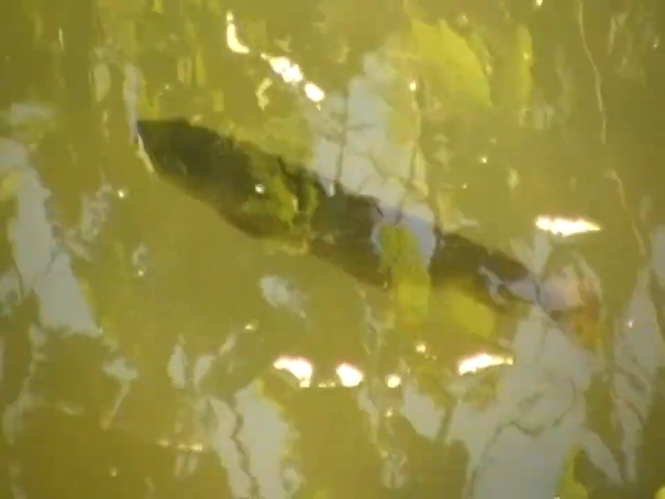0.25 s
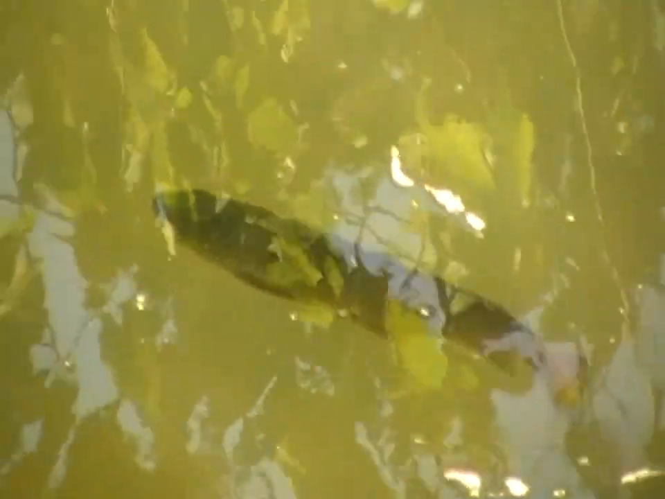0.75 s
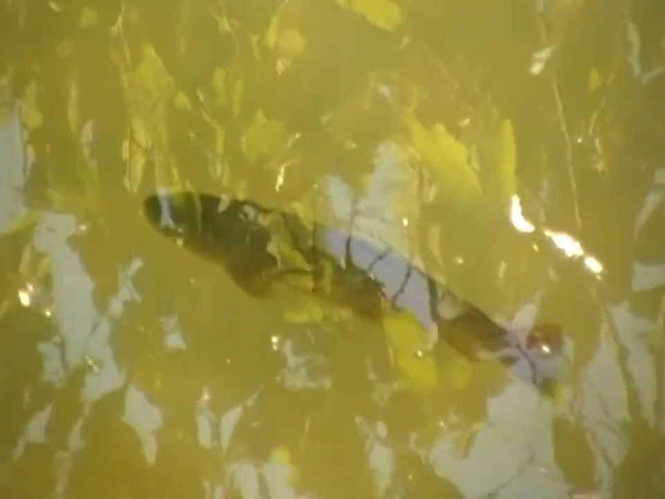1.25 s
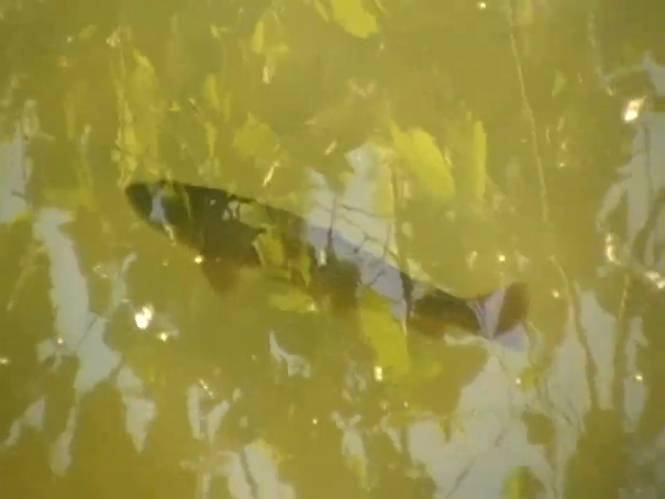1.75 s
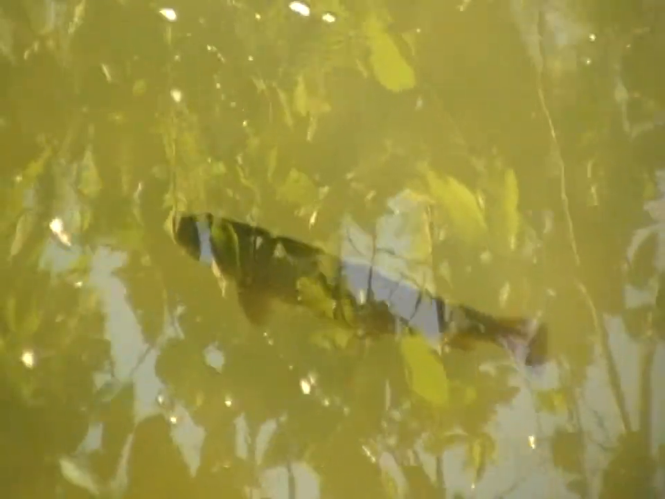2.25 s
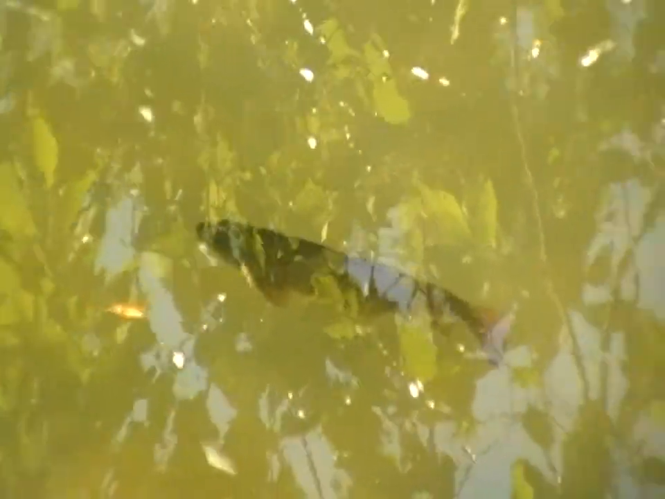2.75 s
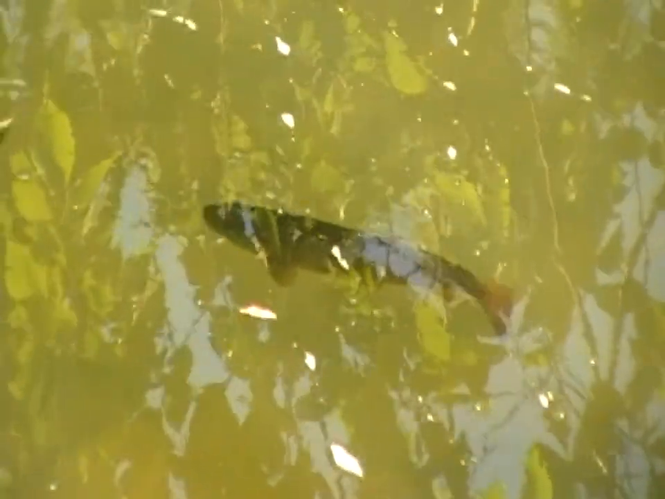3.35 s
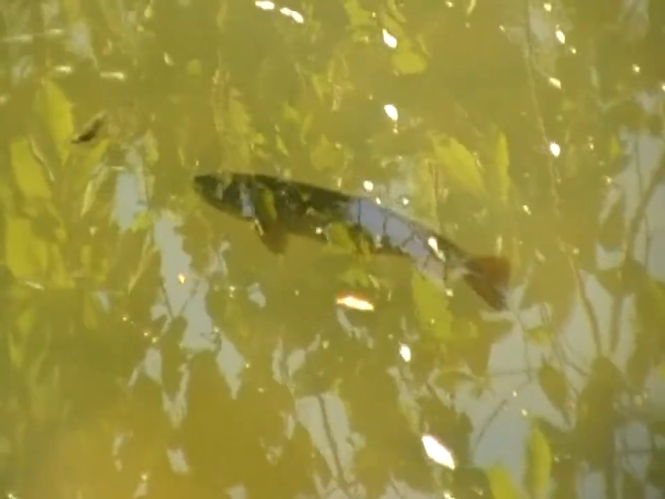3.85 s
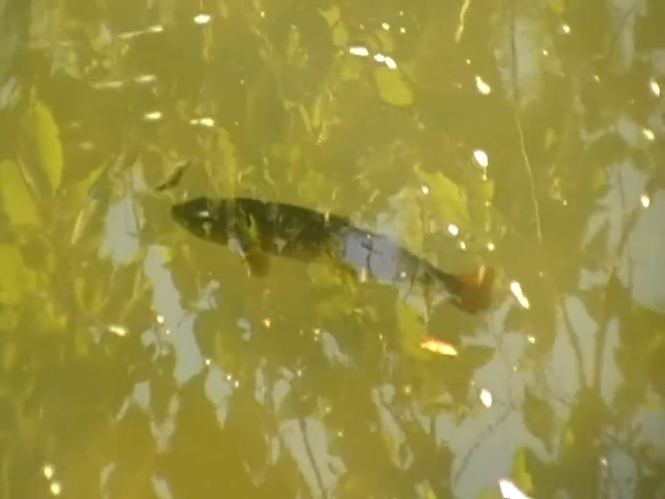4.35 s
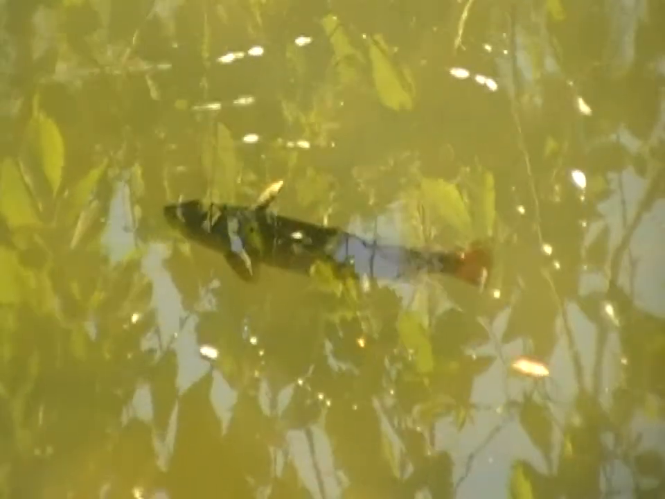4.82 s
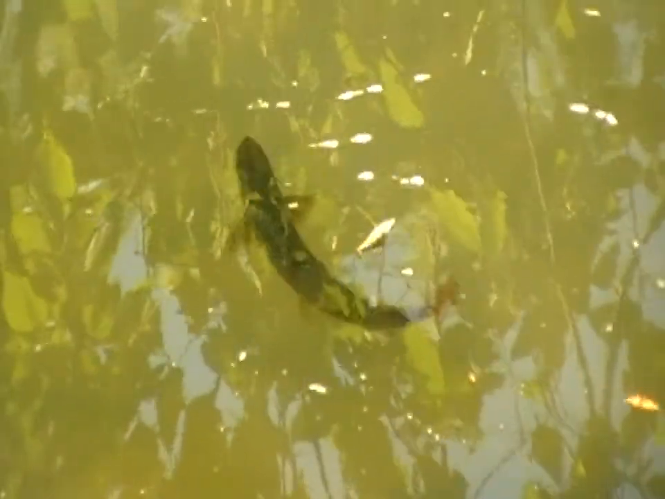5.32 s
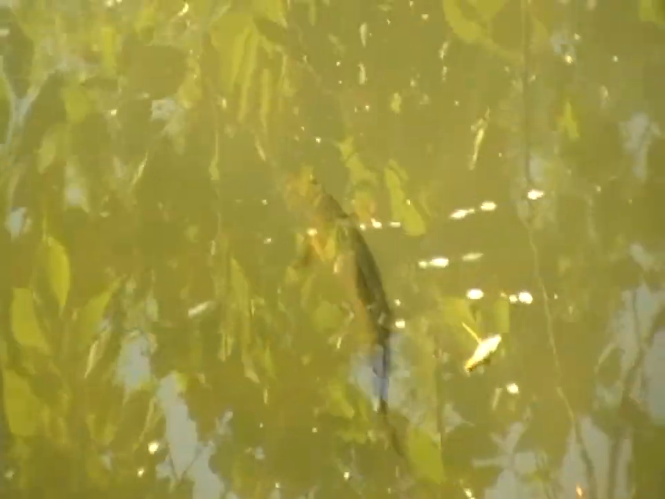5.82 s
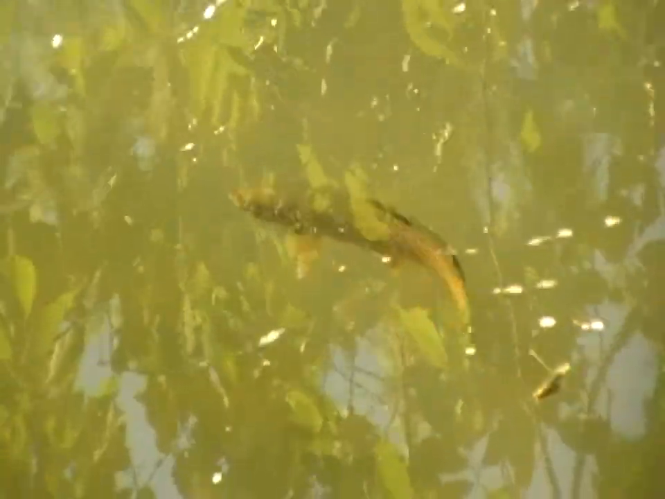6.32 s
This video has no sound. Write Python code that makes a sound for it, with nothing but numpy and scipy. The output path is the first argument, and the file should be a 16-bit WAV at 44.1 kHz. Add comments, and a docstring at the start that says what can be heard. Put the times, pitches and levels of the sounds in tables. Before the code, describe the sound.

From 0 to about 6.6 seconds, a dense insect chorus, probably cicadas, drones without pause: a shrill, grainy, hissing buzz concentrated around 5 to 6 kHz, almost steady, with slight flutter and a little brighter near 5.4 seconds. It is much louder on the right, with a wide, phasey stereo feel. Beneath are a soft camera motor whir, faint low airy noise and a barely perceptible hum. Fingers tap the plastic case at 0.3 and 0.55 seconds, then in a run from 2.07 to 2.43, with the sharpest click at 2.86 and small rattles until 3.3. Duller knocks come around 4.3, and a last one at 5.8. A distant bird whistles very faintly, gliding down at 1.3, then briefly at 2.1, 3.2 and 3.4, blurred by a short echo. The swimming fish makes no audible splash.

```python
"""Insect chorus over a quiet river

A dense chorus, probably cicadas, drones in the trees: click trains and noise ring a song peaking near 5.8 kHz.
A far bird gives a few faint gliding whistles, blurred by an echo tail. A hand-held camera whirs softly
(noise and motor lines), and its case clicks and knocks under the fingers (short pushes through resonances).
Low, airy noise and hum lie beneath. Chorus and camera are strongly out of phase between the channels,
and the right one hears the chorus much louder."""
import sys
import numpy as np
from scipy import signal
from scipy.fft import rfft, irfft, next_fast_len
from scipy.io import wavfile
from scipy.ndimage import map_coordinates

SR = 44100
rng = np.random.default_rng(int(sys.argv[2]) if len(sys.argv) > 2 else 0)


def log_audio(samples):
    """Write samples as a 16-bit WAV file to the path given in sys.argv[1]."""
    # one column per channel
    frames = np.atleast_2d(samples).T
    # limit to full scale, then quantise
    limited = np.clip(frames, -1, 1)
    pcm = np.round(limited * 32767).astype(np.int16)
    wavfile.write(sys.argv[1], SR, pcm)


N = 290178

# Nearly steady level of the whole chorus, with slight random unevenness: (time [s], level [dB])
CHORUS_LEVEL = [(0, -26), (0.72, -26), (0.93, -27.2), (1.27, -26), (1.55, -26), (2.45, -26), (2.75, -25.5),
                (2.9, -27), (3.2, -25.5), (3.75, -26.5), (4.1, -25.5), (4.2, -26), (4.32, -25.5),
                (4.87, -25.5), (4.94, -26), (5.75, -26.5), (6.15, -27), (6.35, -26), (6.58, -26)]
# Gain of the chorus treble above EDGE_HZ: (time [s], gain [dB])
TREBLE_GAIN = [(0, 1), (.5, 0.5), (1.2, -1), (2.6, -1.8), (4, -0.5), (4.7, -0.5), (5.4, 2.3), (5.85, 0.8),
               (6.1, 0.5), (6.58, -0.5)]
# Colour of the insects' song: (frequency [Hz], relative density [dB per Hz])
SONG_COLOUR = [(1350, -57), (2300, -44.5), (3010, -32), (3450, -23), (3850, -16), (4300, -12.5),
               (4600, -12.5), (5250, -3.5), (5790, 2), (6250, -2.5), (6900, -17), (7500, -28), (8300, -34),
               (9300, -43.5), (10300, -64), (13000, -88)]
# Colour of the faint high noise above the song: (frequency [Hz], relative density [dB per Hz])
HIGH_NOISE_COLOUR = [(6000, -40.5), (8000, 3), (10000, 1), (11700, 0.5), (13500, -12), (15700, -19.5)]
# Bird whistles: (time [s], length [s], start pitch [Hz], end pitch [Hz], level before echo [dB])
BIRD_WHISTLES = [(1.285, 0.2, 2750, 2350, -58), (2.067, 0.13, 2550, 2440, -63),
                 (3.214, 0.18, 2890, 2868, -59), (3.423, 0.26, 2480, 2470, -64.5)]
# Finger contacts on the case; ring and rattle are set against the blow's rms:
# (time [s], blow peak [dB], centre [Hz], width [octaves], ring [dB], rattle [dB])
FINGER_KNOCKS = [(0.291, -34, 820, 0.64, 0, -5.5), (0.545, -37, 695, 0.63, -9, -6),
                 (0.594, -41.5, 750, 0.8, -3, 1), (2.068, -36, 740, 0.79, -2.5, -11),
                 (2.276, -31, 830, 0.82, -0.5, -2.5), (2.314, -32, 966, 0.84, -1, -1),
                 (2.357, -33.5, 840, 0.52, -9, -5), (2.431, -35.5, 676, 1, -0.5, -6),
                 (2.854, -27.5, 740, 0.49, -5, -10), (2.8575, -35, 496, 0.52, 8, -25),
                 (2.8605, -21.5, 1390, 0.65, 3.5, -13), (2.861, -33.5, 3400, 0.1, -19, -18),
                 (2.8647, -25, 1570, 0.25, -3, -18), (2.897, -39, 1750, 0.37, -8, -2),
                 (2.9155, -36.5, 1340, 0.25, -12, -8), (3.003, -36, 1600, 0.7, -5, -5),
                 (3.0055, -37.5, 670, 0.3, -3, -9), (3.016, -42, 1050, 0.87, 3, -12),
                 (3.269, -42, 564, 0.18, -17, -22), (3.311, -44.5, 560, 0.25, -20, 1),
                 (4.265, -31, 533, 0.29, -22, -10.5), (4.2935, -31.5, 528, 0.31, -23, -15),
                 (4.299, -39, 614, 0.15, -16, -14), (5.830, -31.5, 906, 0.58, -6.5, -4)]
# Resonances of the camera case: (frequency [Hz], width [Hz], gain [dB])
CASE_MODES = [(510.4, 15, 6), (660, 25, -4), (745, 72, -2), (945, 49, -10), (1107, 30, -2.5),
              (1365, 37, 1.5), (1586, 25, 5), (1910, 110, -4), (2050, 34, -5), (2430, 27, -5)]
# Camera motor lines: (frequency [Hz], centre rms level [dB])
MOTOR_LINES = [(543, -69), (581, -80), (724, -84.5), (1025, -76.5), (1086, -67), (1145, -70), (1601, -82)]
# Colour of the camera's whir: (frequency [Hz], relative density [dB per Hz])
WHIR_COLOUR = [(150, -35.5), (330, -12), (460, -13), (560, 5.5), (670, 2), (850, 4), (1130, 1), (1270, -6),
               (1380, 3), (1600, -23), (1780, -5), (2000, -3.5), (2600, -37), (4000, -59.5)]
# Level of each channel's own share of the riverside air: (time [s], level [dB])
BREEZE_LEVEL = [(0, -59.5), (1.2, -56.5), (2, -60.5), (3.5, -62.5), (4.3, -58.5), (5.3, -61), (6.58, -58.5)]
# Colour of the riverside air: (frequency [Hz], relative density [dB per Hz])
AIR_COLOUR = [(25, -25.5), (45, -21), (70, -8), (100, -14), (170, -8), (280, 1), (380, 2.5), (600, -11.5),
              (1200, -1), (2400, -19), (5000, -42.5)]
# Faint low hum: (frequency [Hz], rms level [dB])
HUM_LINES = [(62, -93), (123, -85)]
# Left channel against right for chorus and bird: (frequency [Hz], level [dB])
FAR_LEVEL_RATIO = [(2500, -4.5), (3200, -8), (4200, -9.5), (5000, -10.5), (5800, -11.5), (7000, -13.5),
                   (8000, -18), (10000, -29.5)]
# Left channel's lead over right for chorus and bird: (frequency [Hz], phase [rad])
FAR_PHASE_LEAD = [(2500, 3.1), (3000, 2.4), (4000, 2.54), (6000, 2.2), (8000, 1.8)]
# Left channel against right for sound carried by the case: (frequency [Hz], level [dB])
CASE_LEVEL_RATIO = [(200, 3), (520, 3.9), (1100, 1.3), (2200, 3.5)]
# Left channel's lead over right for sound carried by the case: (frequency [Hz], phase [rad])
CASE_PHASE_LEAD = [(200, 3.3), (520, 3.69), (900, 3.93), (2200, 3.6)]

RASP_HZ, EDGE_HZ = 4931, 6800  # the shrill band starts at the first; its treble lies above the second
CLICK_DB = -7.5  # insect clicks against the scattered wash
RASP_DB = -11.5  # lower rasp against the shrill band
HIGH_NOISE_DB = -52  # centre level of the high noise against the shrill band
ECHO_SHARE, ECHO_T60_S = 0.14, 0.12  # the trees' answer to the bird
RATTLE_T60_S = 0.12  # how fast the rattle after a knock dies
CASE_LOW_HZ, CASE_HIGH_HZ = 300, 2500  # the thin plastic carries little outside this range
TOP_HZ = 15720  # upper band limit


def amp(db):
    """Decibels to gain."""
    return 10 ** (np.asarray(db) / 20)


def unit(x):
    """x at rms 1."""
    return x / np.sqrt(np.mean(x ** 2) + 1e-20)


def along(points, hz):
    """(Hz, value) points read on a log axis."""
    f, v = np.transpose(points)
    return np.interp(np.log(hz + 1), np.log(f + 1), v)


def curve(points):
    """(time, value) points as one value per sample."""
    s, v = np.transpose(points)
    return np.interp(np.arange(N) / SR, s, v)


def wobble(rate):
    """A smooth random curve, rate knots a second."""
    knots = rng.standard_normal(256)
    coarse = np.arange(0, N + 64, 64)
    smooth = map_coordinates(knots, [coarse * rate / SR], mode="wrap")
    return np.interp(np.arange(N), coarse, smooth)


def filtered(x, response):
    """x times a complex response of frequency."""
    size = x.shape[-1]
    m = next_fast_len(size + SR // 10)
    spectrum = rfft(x, m) * response(np.fft.rfftfreq(m, 1 / SR))
    return irfft(spectrum, m)[..., :size]


def noise(colour):
    """Noise of rms 1 with the given colour."""
    return unit(filtered(rng.standard_normal(N), lambda hz: amp(along(colour, hz))))


def sine(hz, drift):
    """A steady pitch of rms 1 whose phase drifts [rad]."""
    t = np.arange(N) / SR
    return np.sqrt(2) * np.sin(2 * np.pi * hz * t + drift)


def stereo(x, balance, phase):
    """Split x into two channels, with a level and phase difference, whose mean is x."""
    def pair(hz):
        ratio = amp(along(balance, hz)) * np.exp(1j * along(phase, hz))
        return 2 * np.array([ratio, np.ones_like(ratio)]) / (1 + ratio)
    return filtered(x, pair)


def tymbals(click_hz, spread, jitter, swell_db, count):
    """Click trains of many insects, each at its own rate and swelling on its own."""
    clicks = np.zeros(N)
    for _ in range(count):
        rate = click_hz * np.exp(spread * rng.uniform(-1, 1))
        gap, size = rng.standard_normal((2, 4096))
        at = (np.cumsum(np.abs(1 + jitter * gap)) * SR / rate).astype(int)
        heard = at < N
        train = np.bincount(at[heard], amp(2 * size[heard]), N)
        clicks += train * amp(swell_db * wobble(2.99))
    return unit(clicks - clicks.mean())


def chorus():
    """Tymbal clicks ring the insects' bodies; the trees scatter most of them into an even wash."""
    treble_db = curve(TREBLE_GAIN)
    direct = tymbals(click_hz=229.7, spread=.5, jitter=.1, swell_db=2.5, count=14)
    wash = rng.standard_normal(N)
    song = filtered(amp(CLICK_DB) * direct + wash, lambda hz: amp(along(SONG_COLOUR, hz)))

    def above(corner):
        return filtered(song, lambda hz: 1 / (1 + (corner / (hz + 1)) ** 24))

    upper, treble = above(RASP_HZ), above(EDGE_HZ)
    shrill = unit(upper + (amp(treble_db) - 1) * treble) * amp(0.35 * wobble(22))
    rasp = unit(song - upper) * amp(RASP_DB)
    # faint high noise follows the treble's level and wavers at random
    high_noise_db = HIGH_NOISE_DB + 2.4 * treble_db + 1.5 * wobble(14)
    high_noise = noise(HIGH_NOISE_COLOUR) * amp(high_noise_db)
    return amp(curve(CHORUS_LEVEL)) * (shrill + rasp + high_noise)


def bird():
    """Far whistles swell and glide down to a level pitch, blurred by echoes among the trees."""
    t, whistles = np.arange(N) / SR, np.zeros(N)
    for start, length, start_hz, end_hz, db in BIRD_WHISTLES:
        u = np.clip((t - start) / length, 0, 1)
        glide = end_hz + (start_hz - end_hz) * (1 - u) ** 2
        pitch = glide * (1 + 0.004 * wobble(70))
        tone = np.sqrt(2) * np.sin(2 * np.pi * np.cumsum(pitch) / SR)
        swell = np.abs(np.sin(np.pi * u ** 1.3)) ** 0.62
        whistles += amp(db + 2.8 * wobble(38)) * swell * tone
    tail = rng.standard_normal(SR // 2) * amp(-60 * t[:SR // 2] / ECHO_T60_S)
    echo = signal.fftconvolve(whistles, tail / np.linalg.norm(tail))[:N]
    return (1 - ECHO_SHARE) * whistles + ECHO_SHARE * echo


def case_response(f):
    """The ringing of the camera case: resonances summed with alternating sign."""
    total = 0
    for k, (centre, width, db) in enumerate(CASE_MODES):
        mode = 1j * f * width / (centre * centre - f * f + 1j * f * width)
        total = total + (-1) ** k * amp(db) * mode
    return total


def handling():
    """Each finger contact is a short push that rings the case, with a brief rattle after it."""
    out, t = np.zeros(N + SR), np.arange(SR // 5) / SR
    lead = SR // 100  # room ahead of the push for the filters' spread
    push = signal.unit_impulse(len(t), lead)
    after = np.maximum(t - lead / SR, 0)
    decay = (after > 0) * amp(-60 * after / RATTLE_T60_S)
    for start, db, centre_hz, octaves, ring_db, rattle_db in FINGER_KNOCKS:
        def band(hz):
            passed = 1 / (1 + (hz / CASE_HIGH_HZ) ** 6 + (CASE_LOW_HZ / (hz + 1)) ** 6)
            return np.exp(-.5 * (np.log2((hz + 1) / centre_hz) / octaves) ** 2) * passed

        blow = unit(filtered(push, band))
        ring = unit(filtered(push, lambda hz: np.sqrt(band(hz)) * case_response(hz)))
        rattle = unit(filtered(rng.standard_normal(len(t)) * decay, band))
        knock = blow + amp(ring_db) * ring + amp(rattle_db) * rattle
        first = round(start * SR) - lead
        out[first:first + len(t)] += amp(db) * knock / np.abs(blow).max()
    return out[:N]


def camera_whir():
    """A small motor: soft noise, partly ringing in the case, and a few unsteady lines."""
    lines = np.zeros(N)
    for hz, db in MOTOR_LINES:
        lines += amp(db + 2.0 * wobble(11)) * sine(hz, 1.05 * wobble(16))
    ringing = unit(filtered(rng.standard_normal(N), case_response))
    return lines + amp(-58.0) * noise(WHIR_COLOUR) + amp(-73.5) * ringing


def air():
    """The faint low rush of the riverside, partly shared by the channels, over a wavering hum."""
    shared = noise(AIR_COLOUR)
    left = noise(AIR_COLOUR) + 0.78 * shared
    right = noise(AIR_COLOUR) + 0.43 * shared
    level_db = curve(BREEZE_LEVEL) + 0.29 * wobble(1.5)
    hum = sum(amp(db) * sine(hz, .7 * wobble(5)) for hz, db in HUM_LINES)
    return hum + amp(level_db) * np.array([left, right])


def scene():
    """Trees and bird from afar, the camera's own sounds through its case, and the air."""
    far = stereo(chorus() + bird(), FAR_LEVEL_RATIO, FAR_PHASE_LEAD)
    near = stereo(handling() + camera_whir(), CASE_LEVEL_RATIO, CASE_PHASE_LEAD)
    return far + near + air()


def record(dry):
    """The camera keeps nothing above its band limit."""
    return filtered(dry, lambda hz: hz < TOP_HZ)


dry = scene()
out = record(dry)
log_audio(out)
```